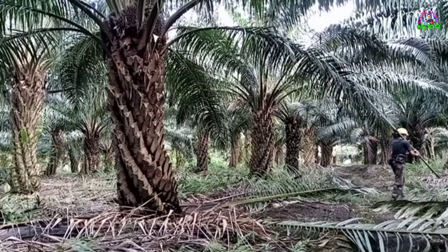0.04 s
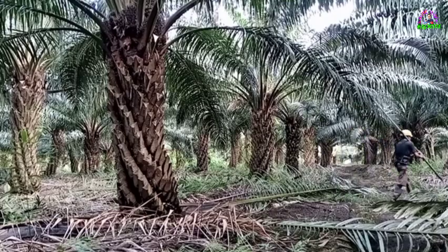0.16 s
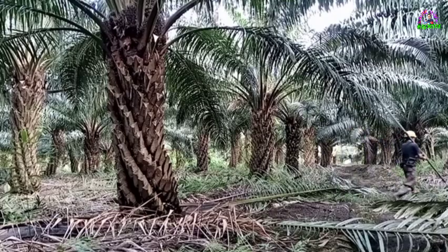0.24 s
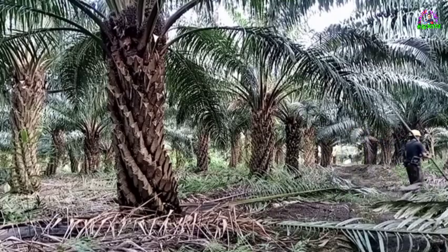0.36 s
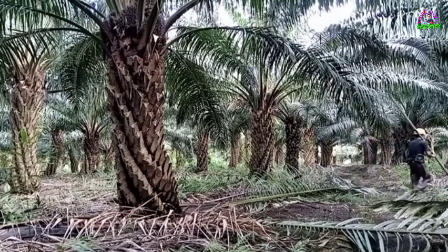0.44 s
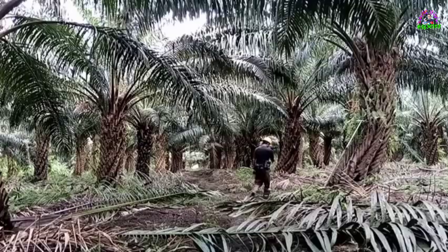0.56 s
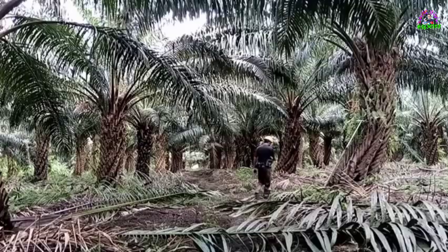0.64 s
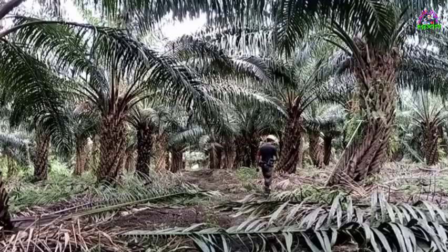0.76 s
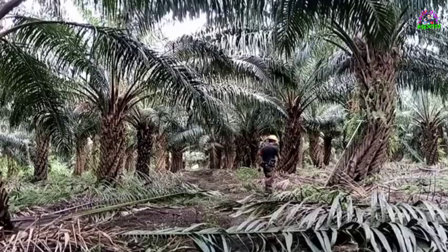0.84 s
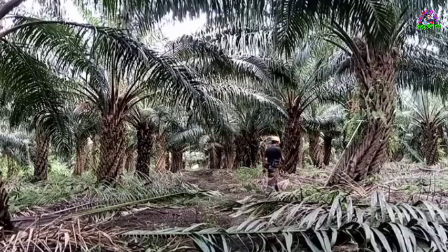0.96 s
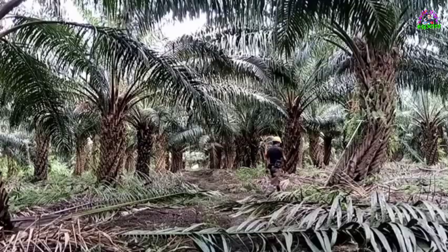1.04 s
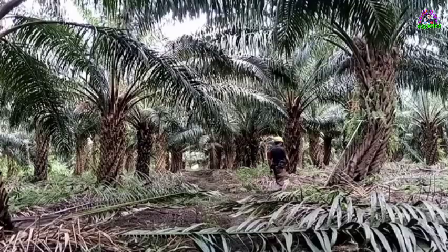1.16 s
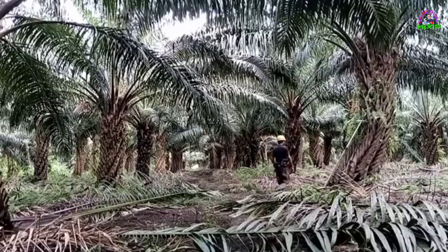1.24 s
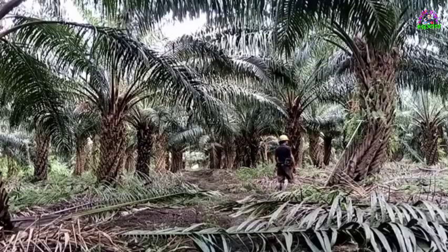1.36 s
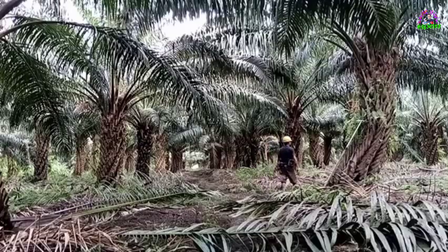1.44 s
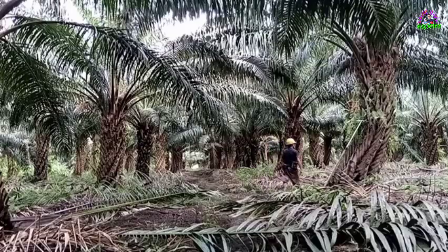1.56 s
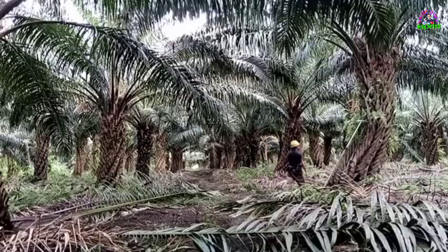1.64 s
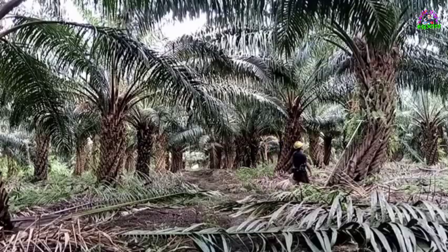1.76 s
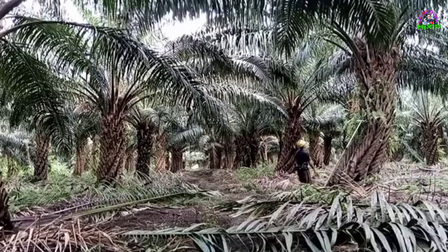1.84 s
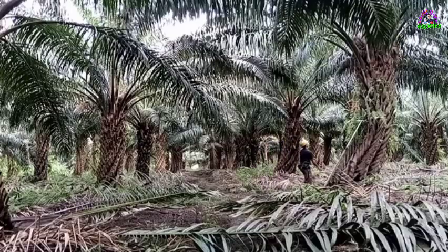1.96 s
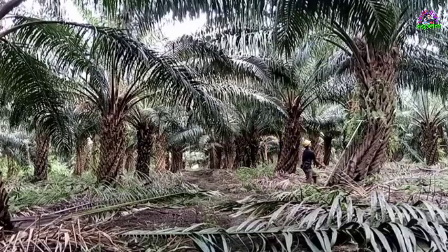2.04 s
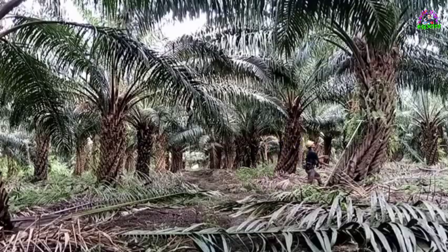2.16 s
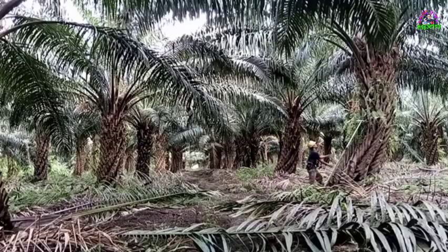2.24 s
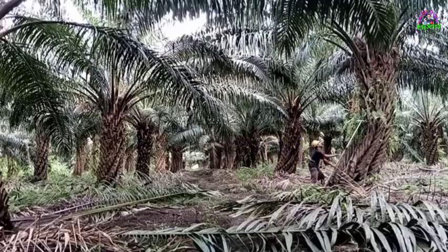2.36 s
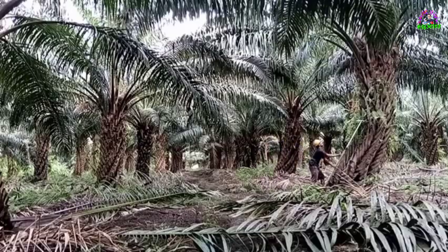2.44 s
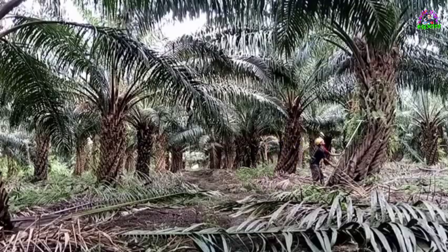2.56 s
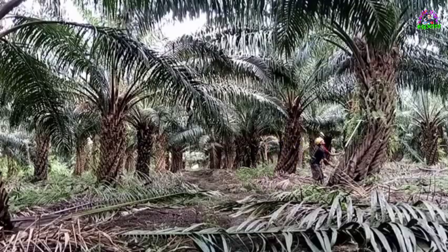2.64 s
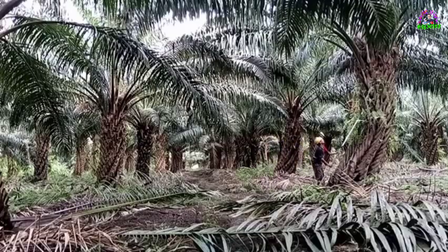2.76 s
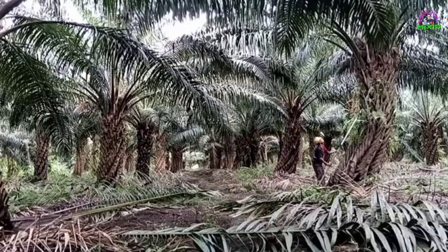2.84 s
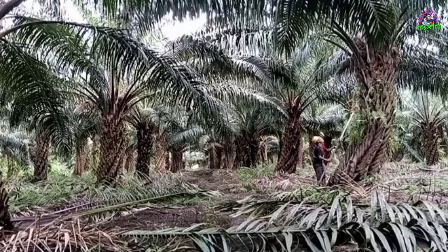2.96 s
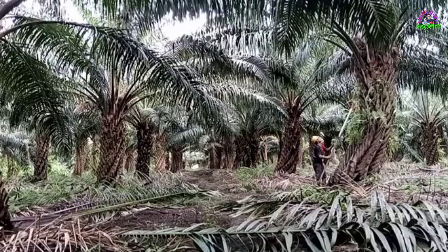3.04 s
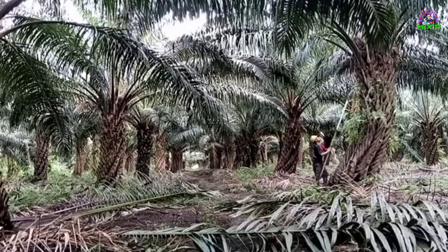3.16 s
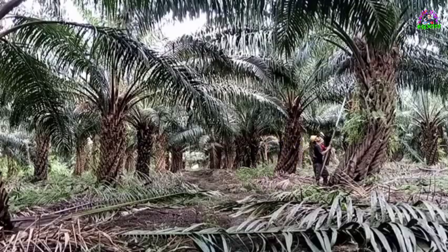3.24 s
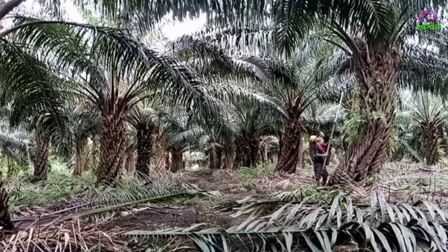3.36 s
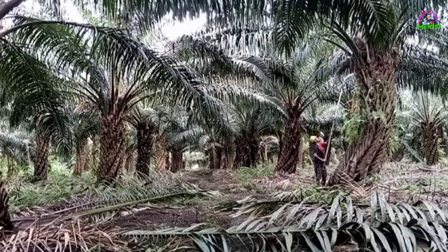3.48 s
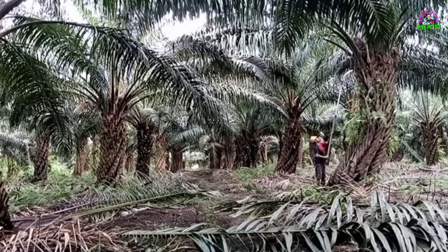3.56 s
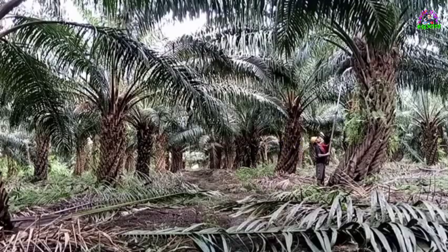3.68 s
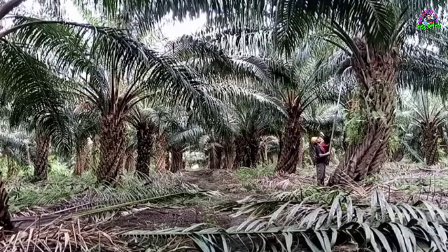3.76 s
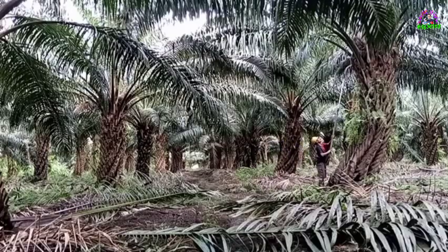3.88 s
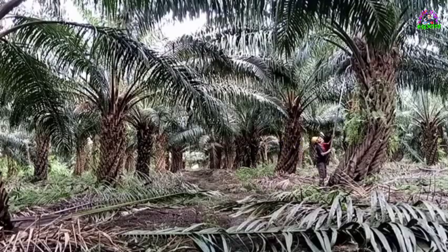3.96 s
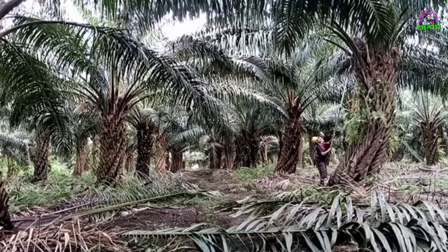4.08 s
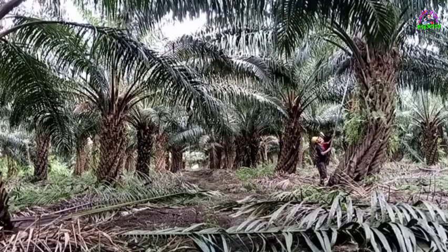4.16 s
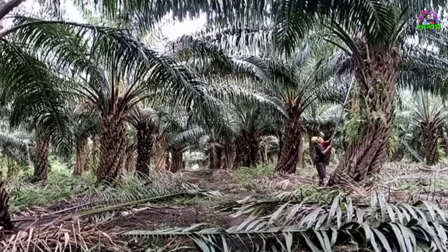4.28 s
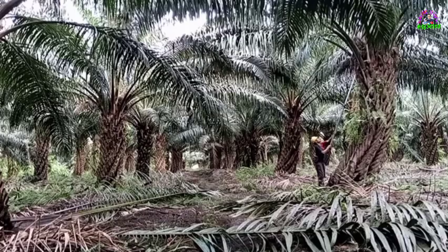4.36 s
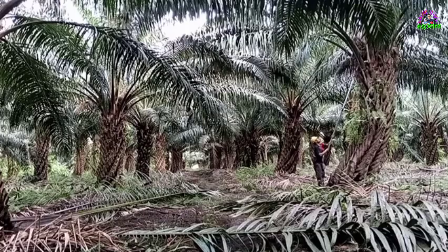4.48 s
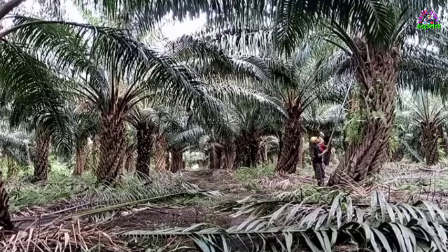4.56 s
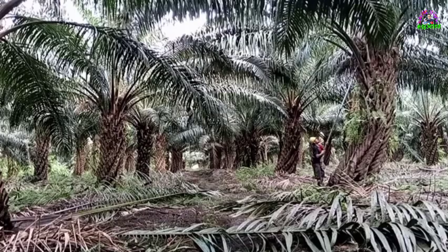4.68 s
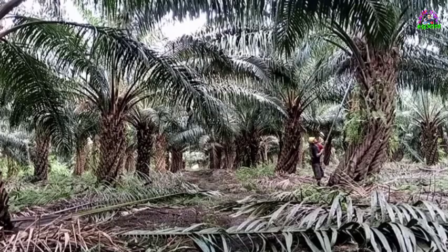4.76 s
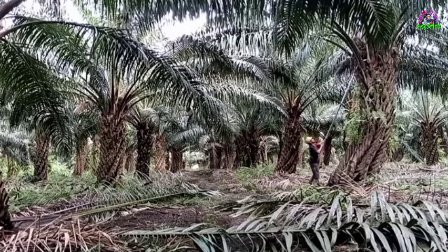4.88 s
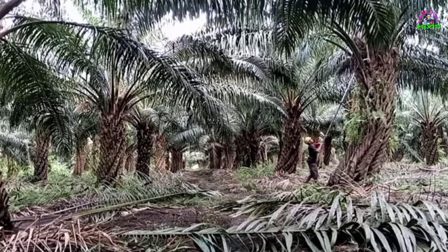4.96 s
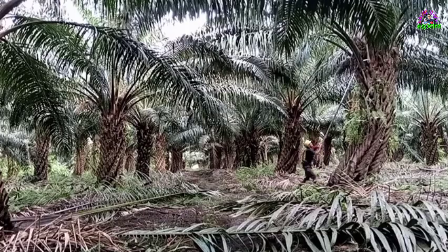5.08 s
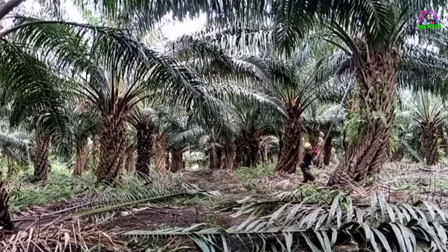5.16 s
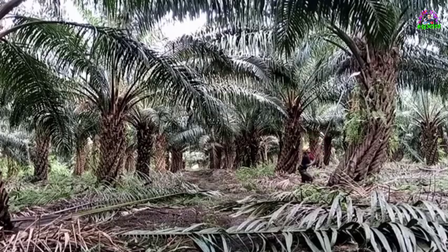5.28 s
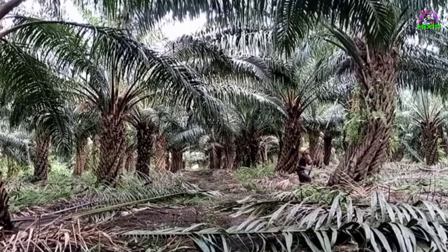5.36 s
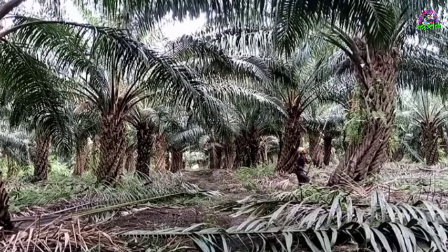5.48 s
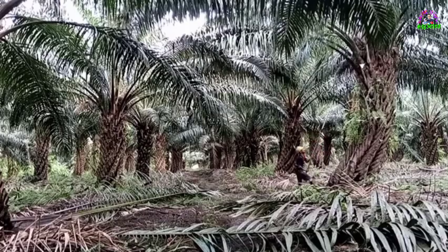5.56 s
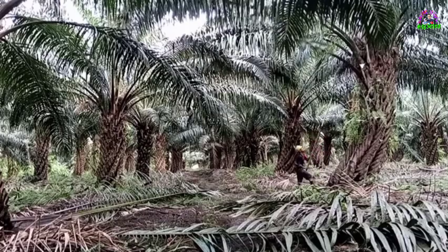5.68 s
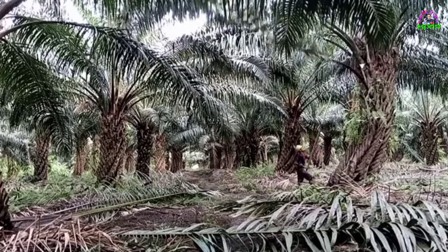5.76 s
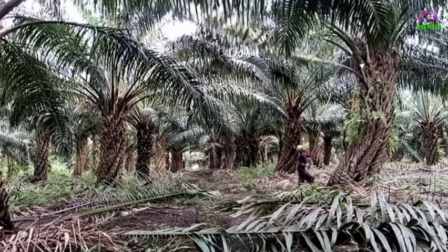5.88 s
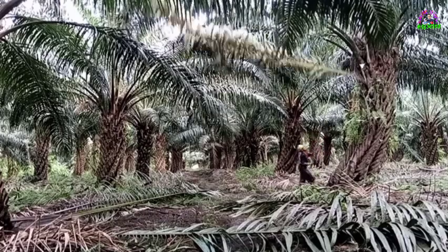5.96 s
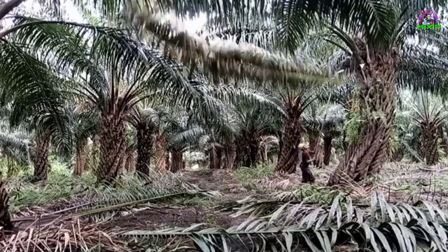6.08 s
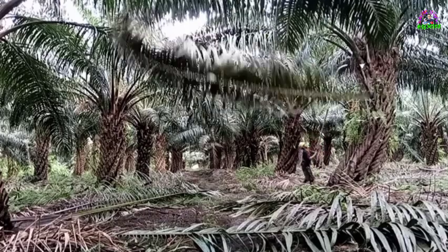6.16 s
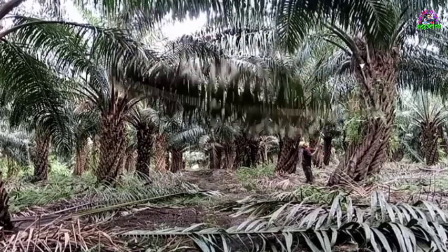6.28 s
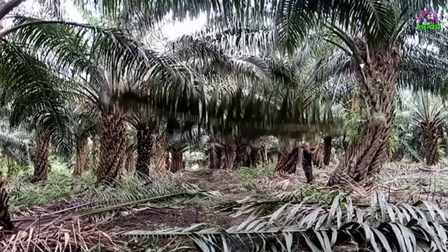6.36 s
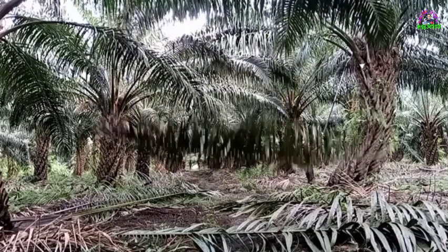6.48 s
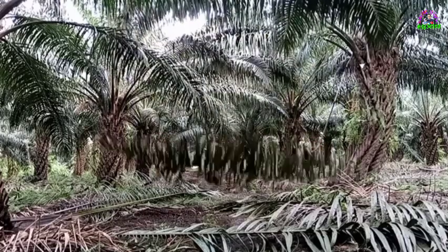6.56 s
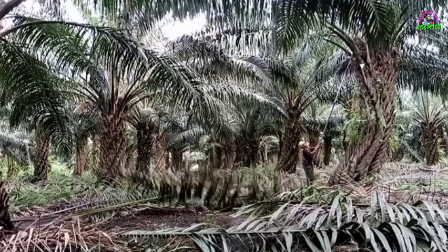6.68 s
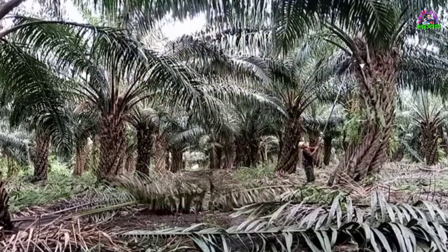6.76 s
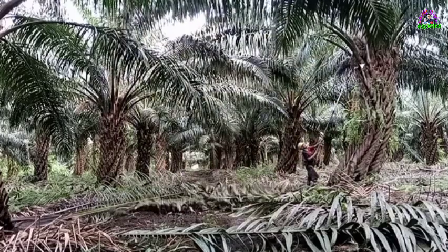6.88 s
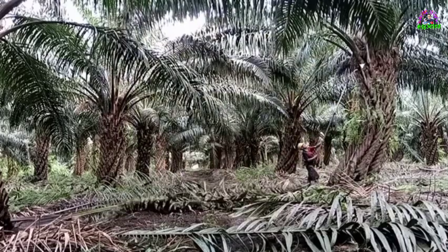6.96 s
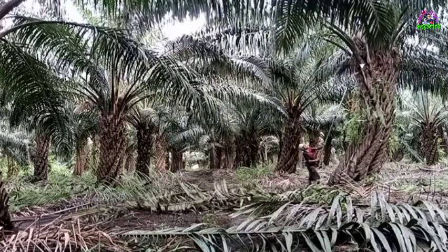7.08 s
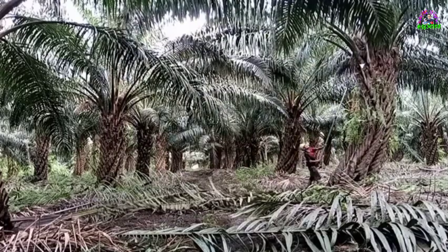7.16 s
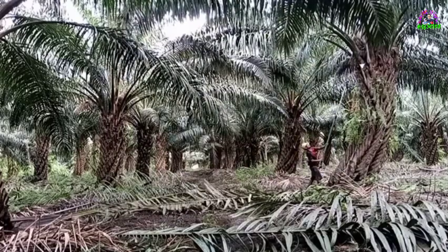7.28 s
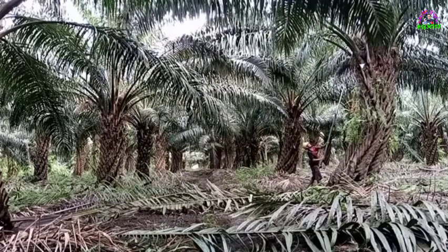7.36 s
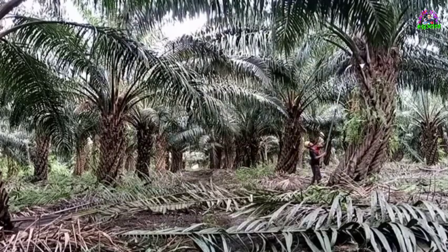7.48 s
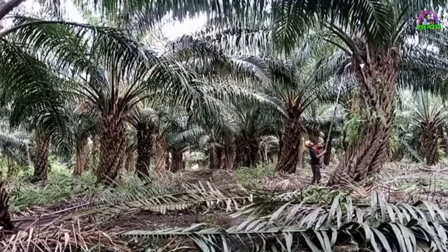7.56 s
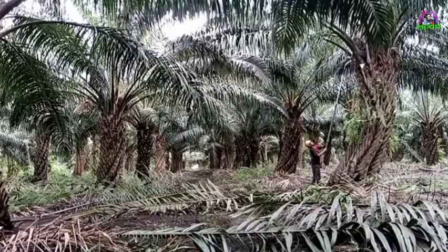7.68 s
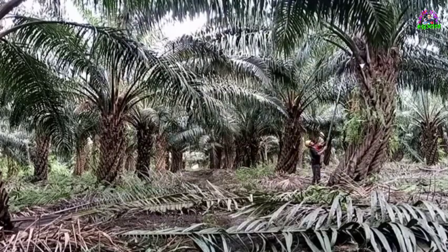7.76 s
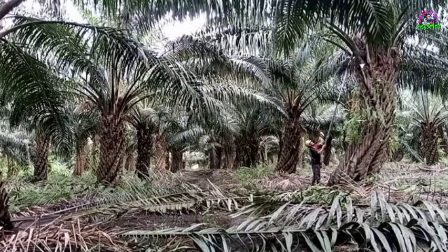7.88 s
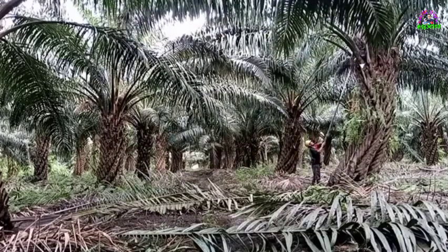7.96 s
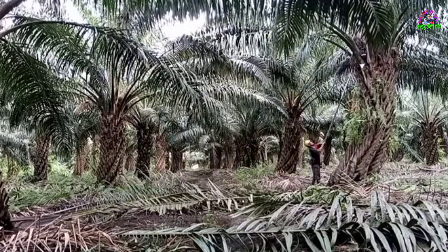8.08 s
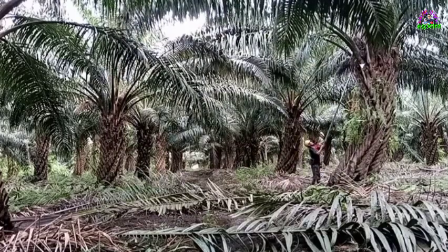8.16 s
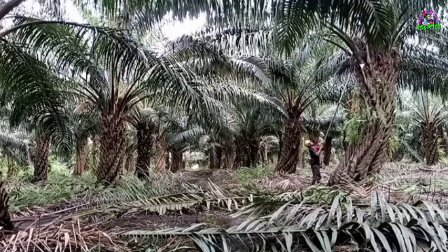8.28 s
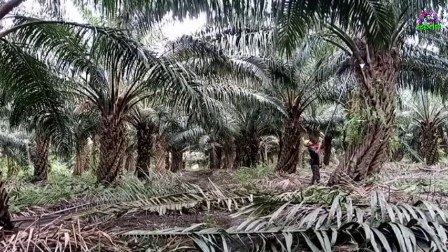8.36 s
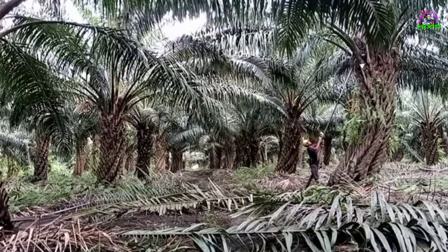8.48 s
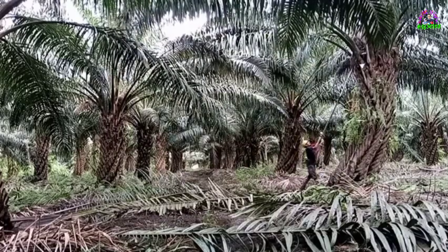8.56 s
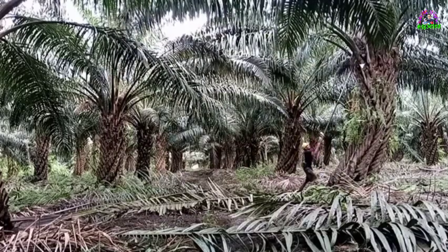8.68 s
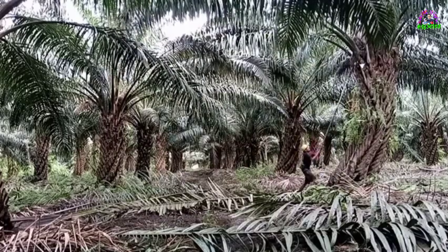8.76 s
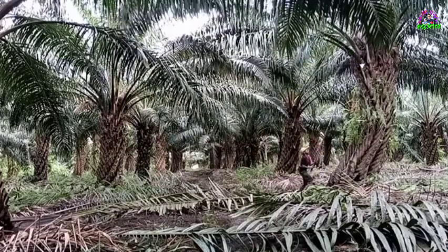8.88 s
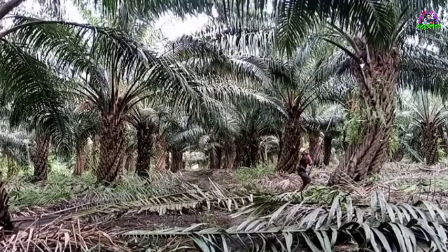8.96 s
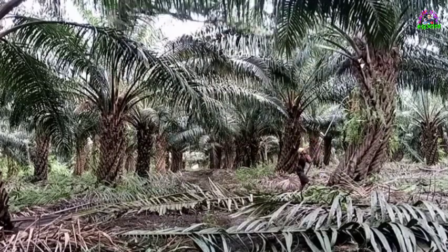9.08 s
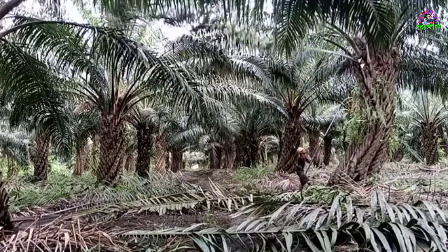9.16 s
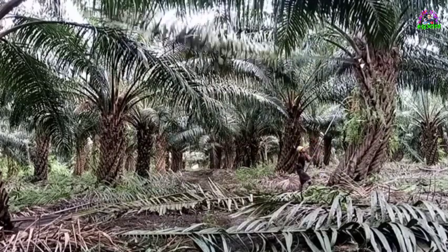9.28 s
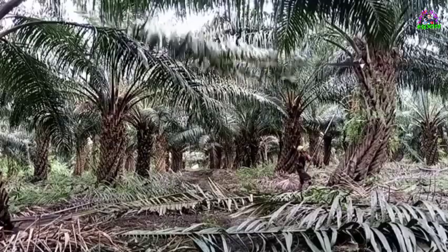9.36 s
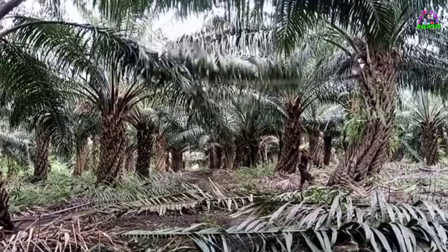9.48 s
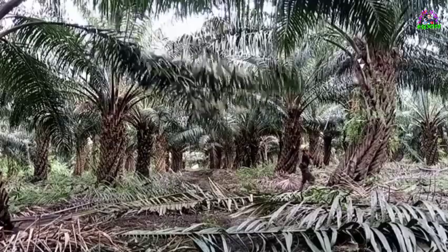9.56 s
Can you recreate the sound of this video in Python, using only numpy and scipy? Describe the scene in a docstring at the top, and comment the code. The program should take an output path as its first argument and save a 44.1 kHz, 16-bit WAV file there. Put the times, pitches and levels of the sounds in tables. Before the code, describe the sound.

A blade on a long pole cracks through palm stalks, a heavy frond swishes down and crashes, while insects drone steadily in an echoing plantation.

```python
"""A sickle on a long pole prunes an oil palm, some way off in a plantation: filtered click bursts crack
the stalk while decaying steel modes ring the blade. Light taps place the hook, slips shake the pole,
and fibres tear in runs of clicks. The frond swishes down as thousands of leaflet ticks and crashes on
the ground with low thuds; a second one starts down at the end. All the while insects drone and chirp,
made of noise bands and a thin wavering tone, over a low rumble. Echoes of the grove surround the work."""
import sys
import numpy as np
from scipy import signal
from scipy.fft import rfft, irfft, next_fast_len
from scipy.io import wavfile
from scipy.ndimage import uniform_filter1d, map_coordinates

SR = 44100
rng = np.random.default_rng(int(sys.argv[2]) if len(sys.argv) > 2 else 0)


def output_pcm(signal):
    """Save a mono or channel-first signal as 16-bit PCM at the path in sys.argv[1].

    Samples are clipped to [-1, 1] before scaling.
    """
    pcm = np.clip(np.atleast_2d(signal).T, -1, 1) * 32767
    wavfile.write(sys.argv[1], SR, np.round(pcm).astype(np.int16))


N = 424241
TIME = np.arange(N) / SR


def amp(db):
    """Decibels to gain."""
    return 10 ** (np.asarray(db) / 20)


def evened(x):
    """Scales to rms 1."""
    return x / np.sqrt(np.mean(x ** 2) + 1e-20)


def matched(sound, drive):
    """Gives a sound the energy of the drive behind it."""
    return sound * np.linalg.norm(drive) / np.linalg.norm(sound)


def read(points, hz):
    """Reads a spectrum on a log-frequency axis."""
    f, value = np.transpose(points)
    return np.interp(np.log(hz + 1), np.log(f + 1), value)


def curves(rows):
    """Every column of a timed table, sample by sample."""
    s, *columns = np.transpose(rows)
    return [np.interp(TIME, s, column) for column in columns]


def add(mix, start_s, sound):
    """Mixes a sound in at its start time."""
    part = mix[max(round(start_s * SR), 0):][:len(sound)]
    part += sound[:len(part)]


def colour(x, gain_db, size=2048):
    """Causal minimum-phase filter following a rule of dB against Hz."""
    hz = abs(np.fft.fftfreq(size, 1 / SR))
    log_gain = np.log(amp(np.maximum(gain_db(hz), -100)))
    taps = np.fft.ifft(np.exp(np.conj(signal.hilbert(log_gain)))).real
    return signal.oaconvolve(x, taps)[:len(x)]


def band(hz, half_width_hz, order=2):
    """Noise in one band, rms 1; a higher order gives a flatter top and steeper sides."""
    size = next_fast_len(N, True)
    f = np.fft.rfftfreq(size, 1 / SR)
    shape = 1 / np.sqrt(1 + ((f - hz) / half_width_hz) ** (2 * order))
    return evened(irfft(rfft(rng.standard_normal(size)) * shape, size)[:N])


def crackle(per_s, spread_db):
    """A random train of clicks, rms 1; positive spread makes a few louder, negative a few softer."""
    size = amp(spread_db * np.minimum(rng.exponential(1, N), 4))
    sign = rng.choice([-1, 1], N)
    return evened(size * sign * (rng.random(N) < per_s / SR))


def swell(length_s):
    """A quick rise and slower fall, rms 1."""
    u = np.linspace(0, 1, max(round(length_s * SR), 2))
    return evened(np.sqrt(u) * (1 - u))


def ripple(hz, spacing_hz):
    """A random, smooth pattern of peaks and dips over frequency, about rms 1."""
    knots = np.arange(0, SR, spacing_hz)
    place = np.interp(hz, knots, np.arange(len(knots)))
    return map_coordinates(rng.standard_normal(1000), [place], order=3, mode="wrap")


def mottled(x, patchy_db, size, count, order):
    """Lays random swells and dips, count frames by order bins, over a sound; returns rms 1."""
    z = signal.stft(x, SR, nperseg=size)[2]
    across_bins = uniform_filter1d(rng.standard_normal(z.shape), order, axis=0)
    patches = evened(uniform_filter1d(across_bins, count, axis=1))
    return evened(signal.istft(z * amp(patchy_db * patches), SR, nperseg=size)[1][:N])


# spectrum of the outdoor air: (pitch_hz [Hz], density_db [dB per Hz])
AIR_SPECTRUM = [(20, -40), (45, -4.5), (85, 4.5), (140, 1), (220, -5.5), (285, -16.5), (450, -20.5),
                (900, -25), (2000, -29), (7000, -31), (9500, -17.5), (10300, -64), (16000, -43)]
# the low rumble swells and sinks: (time_s [s], level_db [dB])
RUMBLE_LEVEL = [(0, 0.5), (1.8, -2), (4.3, 1), (5.2, 5.5), (7.8, -1.5), (8.8, 5.5), (9.62, 0)]
AIR_DB = -61


def air():
    """A low, lumpy outdoor rumble under faint, even hiss."""
    wash = evened(colour(rng.standard_normal(N), lambda hz: read(AIR_SPECTRUM, hz), size=4096))
    low = signal.sosfiltfilt(signal.butter(4, 300, fs=SR, output="sos"), wash)
    lumps = mottled(low, patchy_db=4.0, size=2048, count=5, order=3) * np.std(low)
    rumble_db = curves(RUMBLE_LEVEL)[0] + 1.6 * band(0, 7.9)
    return amp(AIR_DB) * (wash - low + lumps * amp(rumble_db))


# bands of the far insect chorus: (centre_hz [Hz], half_width_hz [Hz], level_db [dB])
CHORUS_BANDS = [(5490, 403, -59.5), (8810, 385, -58)]
# insect levels over time: (time_s [s], near_singer_db [dB], far_chorus_change_db [dB])
INSECT_LEVELS = [(0, -52, -2), (1.8, -54, -2.5), (2.4, -54.5, -1.5), (4.2, -53.5, -0.5), (7.9, -54.5, -0.5),
                 (9.62, -61, -8)]
# chirps of one phrase: (place [0-1 of the phrase], width [share of the phrase], level_db [dB])
CHIRPS = [(0, .11, 0), (.27, .06, -10), (.5, .085, -4), (.76, .065, -8)]
SINGER_HZ, PHRASES_PER_S = 7402, 14.55


def insects():
    """A far chorus in two noise bands, and one near insect chirping a fast phrase on a thin tone."""
    singer_db, chorus_db = curves(INSECT_LEVELS)
    phrase = PHRASES_PER_S * TIME
    chirps = np.zeros(N)
    for place, width, db in CHIRPS:
        away = (phrase - place + .5) % 1 - .5  # distance from the chirp, in phrases
        chirps += amp(db) * np.exp(-(away / width) ** 2)
    pitch_hz = SINGER_HZ + 24 * band(0, 50.0, order=3)  # the tone is never quite steady
    tone = np.sin(2 * np.pi * np.cumsum(pitch_hz) / SR)
    near = evened((chirps + .15) * tone * amp(1.4 * band(0, 20)))
    scattered = amp(-7) * band(7342, 51) + amp(-17.0) * band(7390, 280, order=4)
    chorus = sum(amp(db) * band(hz, half_width_hz, order=7) for hz, half_width_hz, db in CHORUS_BANDS)
    return amp(singer_db) * (near + scattered) + chorus * amp(chorus_db + 0.85 * band(0, 20))


# how long the echoes last: (pitch_hz [Hz], t60_s [s])
GROVE_T60 = [(150, 0.63), (1000, 0.47), (4000, 0.53), (8000, 0.48), (15000, 0.14)]


def grove(x):
    """Trunks and crowns scatter the sound back: the echoes build up, then die band by band."""
    echoes = rng.choice([-1., 1.], SR) * (rng.random(SR) < 4000 / SR)
    hz, t, z = signal.stft(echoes, SR, nperseg=256)
    tone_db = read([(100, 8.0), (1000, 4.5), (5000, 4.5), (9000, 7), (15000, 5)], hz)[:, None]
    decay_db = 60 * t / read(GROVE_T60, hz)[:, None]
    tail = signal.istft(z * amp(tone_db - decay_db), SR, nperseg=256)[1][:SR]
    tail = tail * (1 - np.exp(-TIME[:SR] / 0.012))
    return signal.oaconvolve(x, tail / np.linalg.norm(tail))[:N]


# soft steps, then the heavy butt of the frond: (start_s [s], level_db [dB], pitch_hz [Hz], decay_s [s])
SOIL_THUDS = [(.425, -59, 376, 0.0093), (.94, -54.5, 423, 0.014), (1.858, -58, 430, 0.016),
              (6.836, -14, 94, 0.015), (6.884, -21, 125, 0.014), (6.961, -37.5, 138.6, 0.097)]


def thuds():
    """Soft soil takes the blow: a low, quickly damped push and a dull puff of litter."""
    out, t = np.zeros(N), np.arange(SR // 2) / SR
    litter = [(40, -29), (120, 3.5), (300, -1.5), (450, -1.5), (620, -12), (2000, -52)]  # (Hz, dB)
    for start_s, db, pitch_hz, decay_s in SOIL_THUDS:
        puff = evened(colour(rng.standard_normal(len(t)), lambda hz: read(litter, hz)))
        push = np.sin(2 * np.pi * pitch_hz * t) + 0.94 * puff
        envelope = (1 - np.exp(-t / 0.0051)) * np.exp(-t / decay_s)
        add(out, start_s, amp(db) * push * envelope)
    return signal.sosfilt(signal.butter(3, 62, "high", fs=SR, output="sos"), out)


# the first frond lands butt first and lies down along its length, then its leaflets settle
LANDING_S, LANDING_DB, LANDING_RISE_S, LANDING_HOLD_S = 6.86, -25, 0.043, 0.19
LANDING_SWELL_DB = 3  # more and more leaflets touch down
SETTLE_DROP_DB, SETTLE_DROP_S, SETTLE_DB_PER_S = 3, 0.037, 51
LANDING_BRIGHT, SETTLE_BRIGHT = -1.85, .3  # dB per octave


def landing():
    """Leaflets meet the ground: quick rise, slow swell, drop, settling; (gain, brightness)."""
    early_s = np.maximum(LANDING_S - TIME, 0)
    late_s = np.maximum(TIME - LANDING_S - LANDING_HOLD_S, 0)
    settling_db = SETTLE_DROP_DB * np.minimum(late_s / SETTLE_DROP_S, 1) + SETTLE_DB_PER_S * late_s
    laid = np.clip((TIME - LANDING_S) / LANDING_HOLD_S, 0, 1)
    level_db = LANDING_DB + LANDING_SWELL_DB * laid - settling_db
    bright = LANDING_BRIGHT + (SETTLE_BRIGHT - LANDING_BRIGHT) * laid ** 2
    return amp(level_db) * np.exp(-early_s / LANDING_RISE_S), bright


# a deep bite jerks the frond and its leaflets shiver: (start_s [s], level_db [dB], decay_s [s])
LEAFLET_SHAKES = [(4.67, -33.5, 0.054), (5.04, -41, 0.81), (5.373, -22.5, 0.098), (5.575, -30, 0.1),
                  (8.218, -33, 0.041), (8.42, -36, 0.033), (8.619, -35, 0.12), (8.901, -20, 0.032)]
SHAKE_RISE_S, SHAKE_BRIGHT = 0.064, 0.24  # brightness in dB per octave
# a cut frond swishes down through the crown: (start_s [s], length_s [s], level_db [dB])
FROND_FALLS = [(5.55, 1.27, -35), (9.0, 1.27, -33)]
FALL_RISE_S, FALL_FADE_DB_PER_S, FALL_BRIGHT = 0.071, 4, -0.89
# leaves brushed in passing, and leaflets stirring as the pull strains before a deep bite: (middle_s [s],
# half_length_s [s], level_db [dB], bright [dB per octave])
LEAF_BRUSHES = [(0.026, .11, -46.5, 3), (0.276, 0.17, -59.5, 1.5), (0.505, 0.21, -53.5, 1),
                (0.8, 0.087, -51.5, 3), (0.913, 0.27, -68, 2.5), (1.902, .08, -73.5, -4),
                (3.24, 0.07, -67, 3.5), (3.68, 0.34, -67, 3), (6.156, 0.1, -37.5, 0),
                (6.242, 0.018, -36.5, 11), (8.625, 0.029, -39, -1), (8.887, 0.046, -40.5, 0.5),
                (9.61, 0.051, -28, -2.5)]


def leaf_motion():
    """Shakes, falls, brushes and the landing add up in power: (level dB, brightness dB per octave)."""
    moves = [landing()]
    for start_s, db, decay_s in LEAFLET_SHAKES:
        t = np.maximum(TIME - start_s, 0)
        shiver = np.minimum(t / SHAKE_RISE_S, 1) * np.exp(-np.maximum(t - SHAKE_RISE_S, 0) / decay_s)
        moves.append((amp(db) * shiver, SHAKE_BRIGHT))
    for start_s, length_s, db in FROND_FALLS:
        t = np.maximum(TIME - start_s, 0)
        swish = np.minimum(t / FALL_RISE_S, 1) * (t < length_s)
        moves.append((amp(db - FALL_FADE_DB_PER_S * t) * swish, FALL_BRIGHT))
    for middle_s, half_length_s, db, bright in LEAF_BRUSHES:
        moves.append((amp(db) * np.exp(-((TIME - middle_s) / half_length_s) ** 2), bright))
    power = sum(gain ** 2 for gain, _ in moves) + 1e-12
    bright = sum(gain ** 2 * bright for gain, bright in moves) / power
    return 10 * np.log10(power), bright


# spectrum of rustling leaflets: (pitch_hz [Hz], density_db [dB per Hz])
RUSTLE_SPECTRUM = [(50, -25.5), (180, -17.5), (500, -5.5), (1100, -4.5), (2500, -1.5), (4500, -0.5),
                   (6500, 3.5), (8500, -4), (10500, -10.5), (13000, -21), (16000, -21)]


def leaves():
    """Thousands of leaflet ticks, bunched in flurries, with sharper slaps among them."""
    level_db, bright = leaf_motion()
    gentle = np.clip((-44.0 - level_db) / 12, 0, 1)  # a light touch moves few leaflets and stays dull
    slaps = amp(-11 + 5.2 * gentle) * crackle(per_s=170, spread_db=1.7)
    unsteady_db = 1.7 * gentle * band(0, 22) - 1.75 * gentle
    ticks = (crackle(per_s=9000, spread_db=1.0) + slaps) * amp(unsteady_db)
    coloured = evened(colour(ticks, lambda hz: read(RUSTLE_SPECTRUM, hz)))
    hz, t, z = signal.stft(coloured, SR, nperseg=256)
    octaves = np.log2(np.maximum(hz, 900) / 4000)[:, None]
    tilt_db = octaves * np.interp(t, TIME, bright)
    dull_db = read([(7000, 0.0), (11000, -7), (15000, -12.5)], hz)[:, None] * np.interp(t, TIME, gentle)
    rustle = signal.istft(z * amp(tilt_db + dull_db), SR, nperseg=256)[1][:N]
    flurries = mottled(rustle, patchy_db=1.2, size=256, count=8, order=9)
    # single leaflets sound their own fleeting pitches
    return amp(level_db) * mottled(flurries, patchy_db=1.5, size=1024, count=7, order=3)


CRUNCH_GAP_S, CRUNCH_S, CRUNCH_DB, CRUNCH_FADE_DB_PER_S = .05, 0.094, -32, 14


def crunches(count=4):
    """Dry stalks break one after another under the landing frond: (start_s, length_s, level_db)."""
    after_s = CRUNCH_GAP_S * (np.arange(count) + rng.uniform(-.5, .5, count) / 2)
    return [(LANDING_S + t, CRUNCH_S, CRUNCH_DB - CRUNCH_FADE_DB_PER_S * t) for t in after_s]


# fibres of the stalk tearing and crunching: (start_s [s], length_s [s], level_db [dB])
FIBRE_TEARS = [(4.975, 0.091, -51.5), (5.031, 0.094, -41), (5.139, .036, -34.5), (5.368, 0.082, -27.5),
               (5.436, 0.018, -29.5), (5.752, 0.076, -36), (5.902, .019, -32.5), (6.597, 0.044, -37.5),
               (8.347, 0.057, -45.5), (8.438, 0.014, -37), (8.775, 0.021, -42), (8.923, 0.098, -38)]
# spectrum of tearing fibres: (pitch_hz [Hz], density_db [dB per Hz])
FIBRE_SPECTRUM = [(50, -24), (130, -3), (230, 5), (340, 1), (450, -1), (600, -1.5), (800, 4), (1600, -5.5),
                  (3000, -3), (8000, -5), (16000, -22)]


def tearing():
    """Thick fibres give way one after another inside the hollow-sounding stalk."""
    out, count = np.zeros(N), 16384
    snaps = crackle(per_s=1300, spread_db=5.0)

    def timbre(hz):
        return read(FIBRE_SPECTRUM, hz) + 2.05 * ripple(hz, 108.0)

    for k, (start_s, length_s, db) in enumerate(FIBRE_TEARS + crunches()):
        strain = np.zeros(count)
        add(strain, 0, swell(length_s))
        run = np.roll(snaps, -k * count)[:count]  # fresh clicks for every tear
        sound = colour(strain * run, timbre)
        add(out, start_s, amp(db) * matched(sound, strain))
    return out


# the pole scrapes along a stalk: (start_s [s], length_s [s], level_db [dB])
POLE_SCRAPES = [(.05, 0.043, -62), (.36, 0.075, -67), (.436, 0.033, -61), (.52, 0.043, -62),
                (.805, 0.034, -58), (2.78, 0.048, -66.5), (2.826, 0.15, -57.5), (3.42, 0.13, -66),
                (3.453, .025, -56), (3.5, 0.034, -61), (3.615, 0.073, -61), (3.688, 0.015, -58.5),
                (3.775, 0.16, -67), (3.862, 0.025, -59), (3.915, 0.082, -61), (3.974, 0.016, -46),
                (4.215, 0.017, -48), (4.942, 0.052, -63), (4.335, 0.025, -50.5), (5.036, 0.083, -37.5),
                (8.01, 0.047, -62), (8.228, 0.047, -37.5), (8.32, 0.063, -36.5)]
TAP_POLE_DB, TAP_POLE_S = -5.5, 0.011  # every tap also shakes the pole; level relative to the tap


def contacts():
    """Everything that shakes the pole: (start_s, length_s, level_db)."""
    return POLE_SCRAPES + [(start_s, TAP_POLE_S, db + TAP_POLE_DB) for start_s, db, _ in HOOK_TAPS]


# resonances of the long hollow pole: (pitch_hz [Hz], width_hz [Hz], level_db [dB])
POLE_MODES = [(822, 42, -5.5), (1042, 160, -5), (1470, 280, -12), (1776, 160, -4), (2175, 174, 1),
              (2572, 68, -1.5), (2840, 250, -5.5), (3750, 45, -5), (3620, 140, -18), (4670, 73, -27)]


def pole():
    """Short runs of slips shake the hollow pole; each contact favours other resonances."""
    out, count = np.zeros(N), 8192
    slips = crackle(per_s=2000, spread_db=2.7)

    def timbre(hz):
        body = sum(amp(db) / (1 + ((hz - f) / (width / 2)) ** 2) for f, width, db in POLE_MODES)
        return 20 * np.log10(body) + 2.6 * ripple(hz, 130.5)

    for k, (start_s, length_s, db) in enumerate(contacts()):
        push = np.zeros(count)
        add(push, 0, swell(length_s))
        run = np.roll(slips, -k * count)[:count]
        sound = colour(push * run, timbre)
        add(out, start_s, amp(db) * matched(sound, push))
    return out


# the edge skids in the cut and squeaks: (start_s [s], length_s [s], level_db [dB])
EDGE_SQUEAKS = [(4.624, 0.025, -31), (5.036, 0.087, -32), (5.304, 0.025, -42), (8.304, 0.051, -30.5),
                (8.655, 0.075, -32.5)]
SQUEAK_HZ, SQUEAK_HALF_WIDTH_HZ = 6380, 70


def squeaks():
    """Friction drives one narrow resonance of the blade."""
    push = np.zeros(N)
    for start_s, length_s, db in EDGE_SQUEAKS:
        add(push, start_s, amp(db) * swell(length_s))
    return push * band(SQUEAK_HZ, SQUEAK_HALF_WIDTH_HZ)


def focus(hz, pitch_hz):
    """A broad hump, 0-1, around the pitch of a crack."""
    return np.exp(-(np.log2((hz + 1) / pitch_hz) / 0.73) ** 2)


# modes of the steel blade: (pitch_hz [Hz], level_db [dB], t60_s [s])
BLADE_MODES = [(2935, -3.5, .35), (3697, -7, .4), (3790, -11, .35), (4495, -8, .35), (4668, -1, .35),
               (5060, -8, .3), (5260, -3, .3), (5526, -7, .35), (5726, -3, .33), (6290, -5, .35),
               (6435, -5, .25), (6472, -4, .33), (7225, -4, .28), (8340, -6, .3)]
DETUNE = 0.0024  # largest share; the stalk loads the blade a little differently in every bite


def blade(t, pitch_hz):
    """The ring of the steel as decaying modes; no two bites shake them alike."""
    mode_hz, mode_db, t60_s = np.transpose(BLADE_MODES)[:, :, None]
    weight, phase, shift = rng.uniform(-1, 1, (3, len(BLADE_MODES), 1))
    size = amp(mode_db + 3 * weight + 3 * focus(mode_hz, pitch_hz))
    free = np.sin(2 * np.pi * (mode_hz * (1 + DETUNE * shift) * t + phase))
    # wedged in the stalk, the blade also has shifted partials that die sooner
    wedged = np.sin(2 * np.pi * mode_hz * (1 + shift / 4) * t) * np.exp(-t / .05)
    modes = size * amp(-60 * t / t60_s) * (free + wedged / 3)
    return np.sum(modes, axis=0) / np.linalg.norm(size)


# bites of the sickle: (start_s [s], level_db [dB], decay_s [s], pitch_hz [Hz] of the crack,
# wood_db [dB] of woody low end, ring_db [dB] of the blade against the crack)
SICKLE_BITES = [(4.216, -35, 0.061, 2830, 11.5, -17), (4.254, -28.5, 0.007, 4000, 9, -28),
                (4.336, -37, 0.028, 2700, -5, -6), (4.521, -41, 0.097, 7600, 20.5, 2.5),
                (4.585, -34.5, 0.038, 4800, 10, -3), (4.628, -27.5, 0.01, 5840, 16, -28),
                (4.6645, -14.5, 0.019, 4600, -2.5, -12), (5.0345, -17.5, 0.014, 3900, 11.5, -9.5),
                (5.078, -20, 0.0063, 4000, 17, -26), (5.122, -22, 0.013, 8350, -13, -18),
                (5.1485, -24, 0.013, 3250, 10, -28), (5.279, -34, .012, 4970, 13, -2.5),
                (5.3435, -9.5, .0065, 4860, -10.5, -27), (5.5775, -12.5, 0.01, 5600, -5, -4.5),
                (8.2265, -23, 0.0097, 3500, 13.5, -11), (8.3055, -25.5, 0.007, 5500, 16, -9),
                (8.326, -31, 0.06, 3700, -10, 1.5), (8.418, -10, 0.0044, 4740, -2, -17.5),
                (8.6245, -20.5, 0.036, 5440, 8, -1), (8.6945, -21, 0.013, 5700, 15, -24),
                (8.8895, -14, 0.019, 5400, -13, -10), (9.155, -18, 0.034, 5200, 1, -6)]
# the sickle taps a stalk while it is being placed: (start_s [s], level_db [dB], decay_s [s])
HOOK_TAPS = [(.062, -47, 0.034), (2.867, -34.5, .013), (3.542, -36, 0.011), (3.953, -40, 0.019),
             (7.775, -43.5, 0.033), (7.9624, -43, 0.027)]
TAP_HZ, TAP_WOOD_DB, TAP_RING_DB = 4070, -9, -18
# a stalk bends too far and snaps: (start_s [s], level_db [dB], decay_s [s], wood_db [dB])
STALK_SNAPS = [(5.791, -19, 0.0042, -14), (5.905, -23, 0.0067, 12), (6.226, -34, 0.031, 32),
               (6.294, -27.5, 0.0078, 7), (6.5943, -29, 0.041, 20), (8.388, -24.5, 0.0082, 3),
               (8.777, -25.5, 0.0035, 13), (9.51, -28.5, 0.0084, 27)]
SNAP_HZ, SNAP_RING_DB = 7000, -35


def cracks():
    """Bites, taps and snaps as rows of the same form as the bites."""
    taps = [(start_s, db, decay_s, TAP_HZ, TAP_WOOD_DB, TAP_RING_DB)
            for start_s, db, decay_s in HOOK_TAPS]
    snaps = [(start_s, db, decay_s, SNAP_HZ, wood_db, SNAP_RING_DB)
             for start_s, db, decay_s, wood_db in STALK_SNAPS]
    return SICKLE_BITES + taps + snaps


# spectrum of a cracking stalk: (pitch_hz [Hz], density_db [dB per Hz])
CRACK_SPECTRUM = [(60, -45), (300, -20), (800, -3.5), (2500, 2), (6500, 3.5), (9000, -1), (11000, -9),
                  (13500, -18.5), (16000, -14)]
SPLINTER_DB, SPLINTER_S = -17, 0.088
SPLINTER_FROM_DB = -23  # much lighter blows than this hardly splinter the stalk


def sickle():
    """Each bite snaps a bunch of fibres, often in milliseconds; splinters follow and the blade rings."""
    out, t = np.zeros(N), np.arange(SR // 2) / SR
    snaps = crackle(per_s=18000, spread_db=-4.5)
    splinters = crackle(per_s=900, spread_db=3.0)
    for k, (start_s, db, decay_s, pitch_hz, wood_db, ring_db) in enumerate(cracks()):
        def timbre(hz):
            stalk_db = 2.8 * ripple(hz, 170)
            low_end_db = wood_db / (1 + (hz / 1800) ** 2)
            # light touches lack the very top
            top = np.clip((hz - 8000) / 6000, 0, 1)
            dull_db = min(db + 28.5, 0) * (1 - focus(9000, pitch_hz)) * top
            return read(CRACK_SPECTRUM, hz) + 7 * focus(hz, pitch_hz) + low_end_db + stalk_db + dull_db

        part = (k * 9000 + np.arange(len(t))) % N  # another stretch of clicks for every blow
        snapping = (1 - np.exp(-t / 0.0008)) * np.exp(-t / decay_s)
        splitting = amp(SPLINTER_DB) * np.exp(-t / SPLINTER_S) / (1 + amp(SPLINTER_FROM_DB - db) ** 2)
        force = snaps[part] * snapping + splitting * splinters[part]
        crack = matched(colour(force, timbre), force)
        ring = amp(ring_db) * blade(t, pitch_hz) * (1 - np.exp(-t / .002))
        add(out, start_s, amp(db) * (crack + ring))
    return out


def scene():
    """The work at the palm, its echoes, and the plantation around; the same in both channels."""
    cutting = sickle() + squeaks() + pole()
    frond = leaves() + tearing() + thuds()
    echoes = grove(amp(-10.5) * cutting + amp(-12.0) * frond)
    mono = cutting + frond + echoes + insects() + air()
    return np.array([mono, mono])


# tone of the whole scene: (pitch_hz [Hz], gain_db [dB])
TOP_LIFT = [(20, -1.5), (13700, -1.5), (14600, 10.5), (15500, 3.5), (16000, 27)]
EDGE_HZ = 15800


def record(dry):
    """The very top is lifted; then a steep low-pass limits the band."""
    heard = np.array([colour(x, lambda hz: read(TOP_LIFT, hz)) for x in dry])
    low_pass = signal.firwin(511, EDGE_HZ, window=("kaiser", 9), fs=SR)
    return signal.oaconvolve(heard, low_pass[None], "same")


dry = scene()
out = record(dry)
output_pcm(out)
```